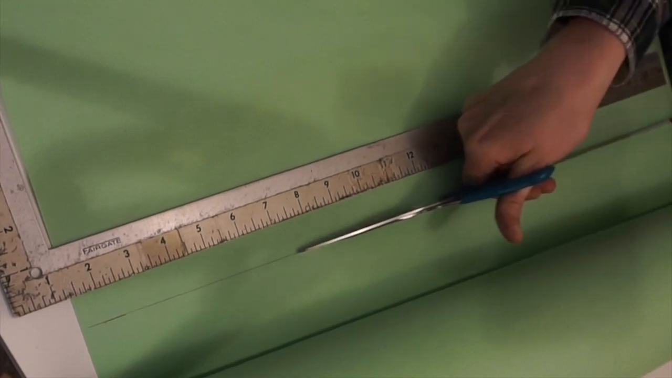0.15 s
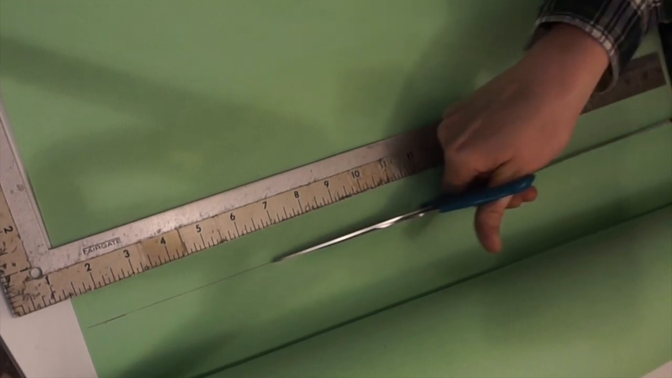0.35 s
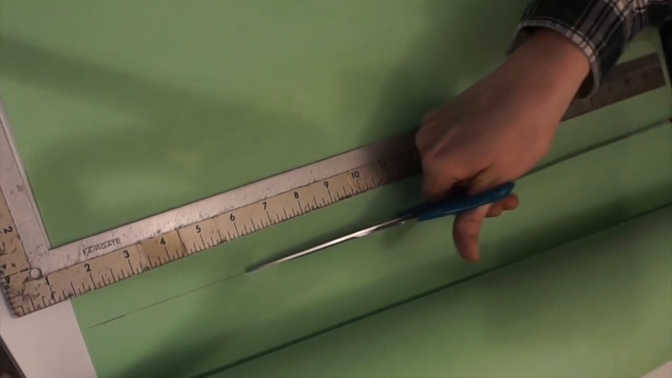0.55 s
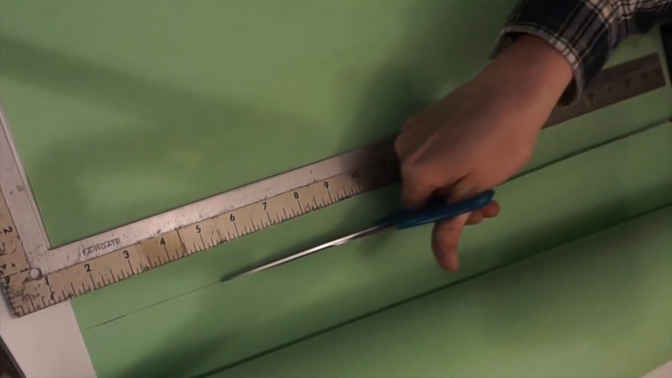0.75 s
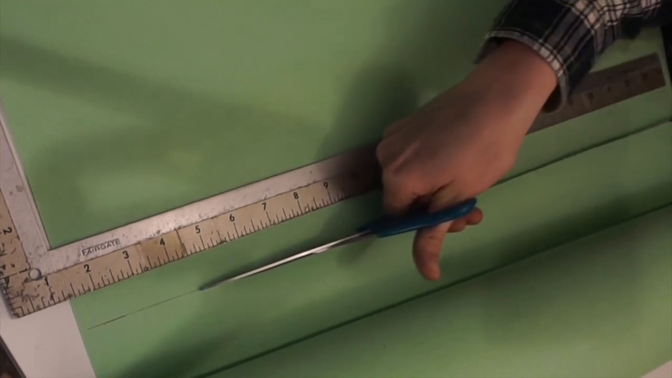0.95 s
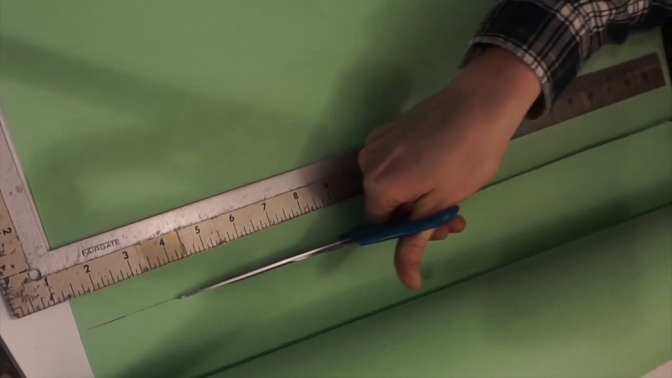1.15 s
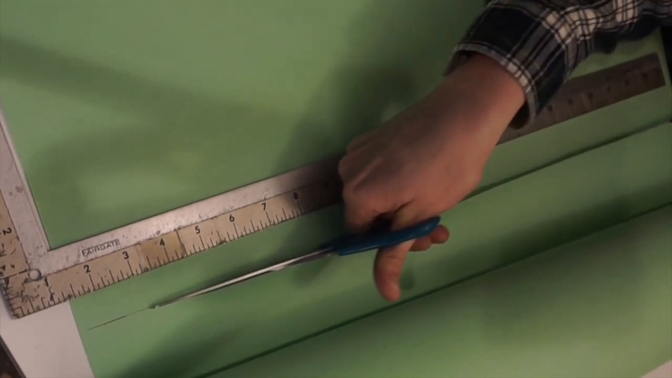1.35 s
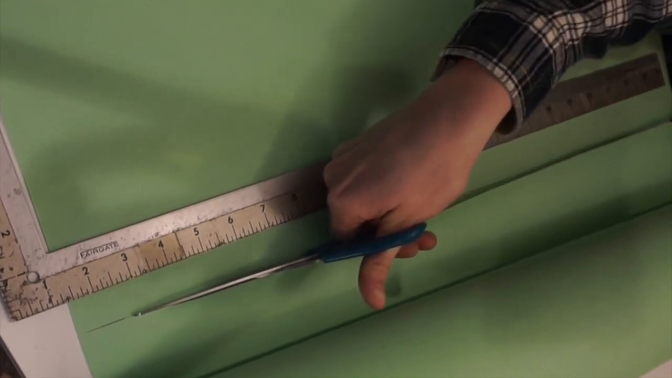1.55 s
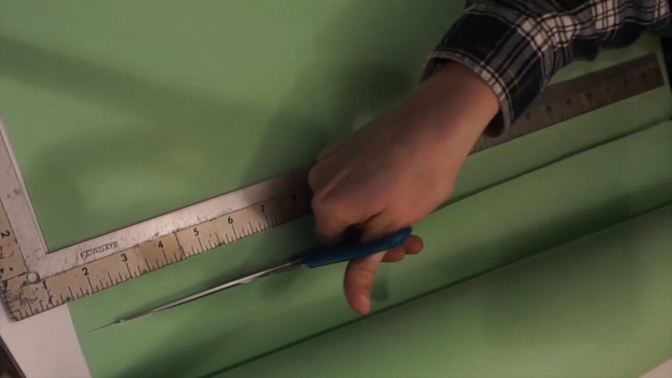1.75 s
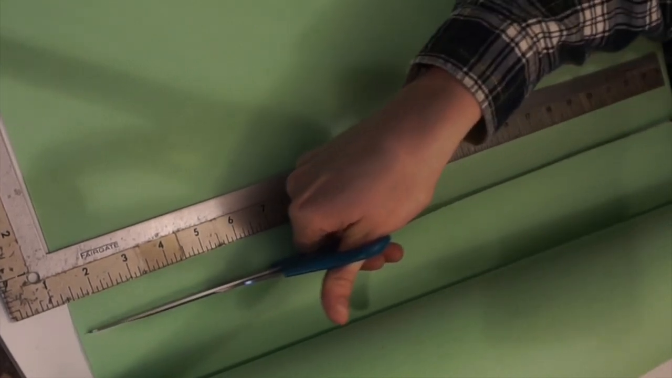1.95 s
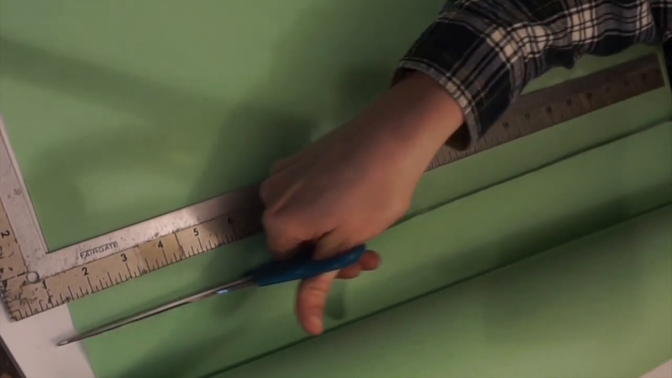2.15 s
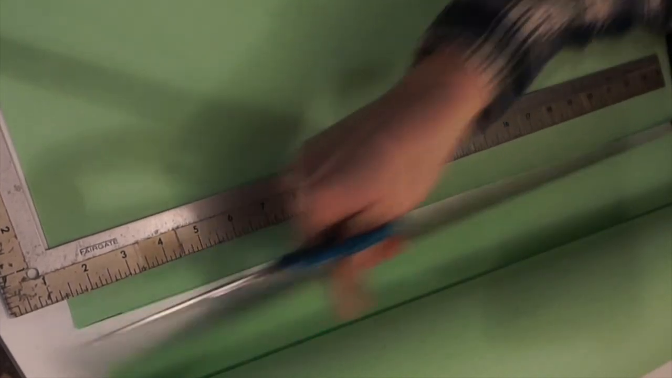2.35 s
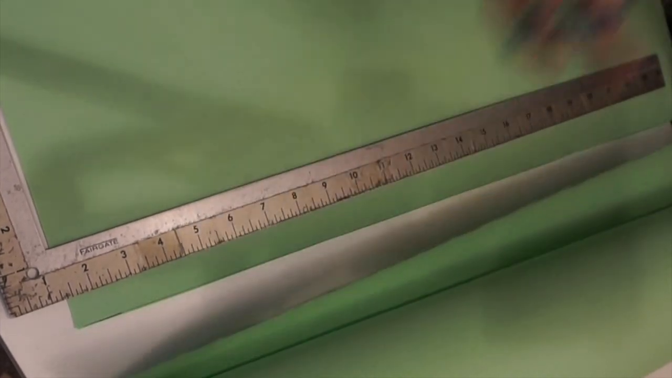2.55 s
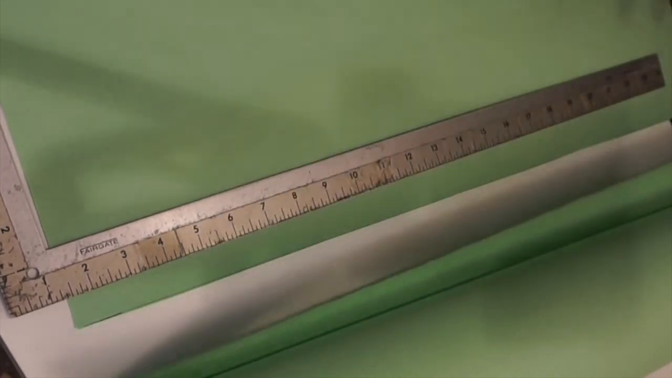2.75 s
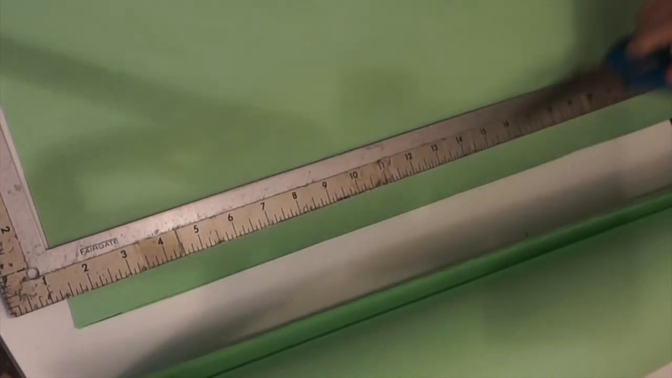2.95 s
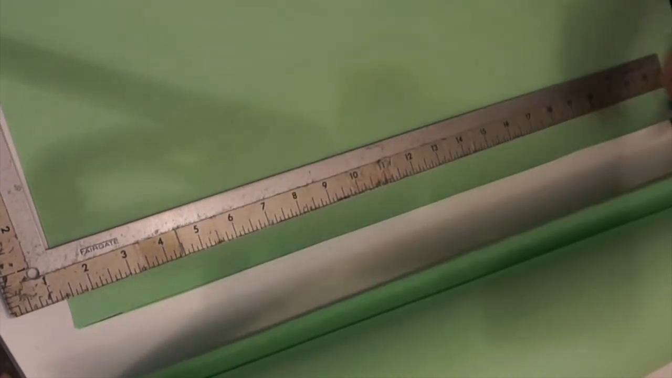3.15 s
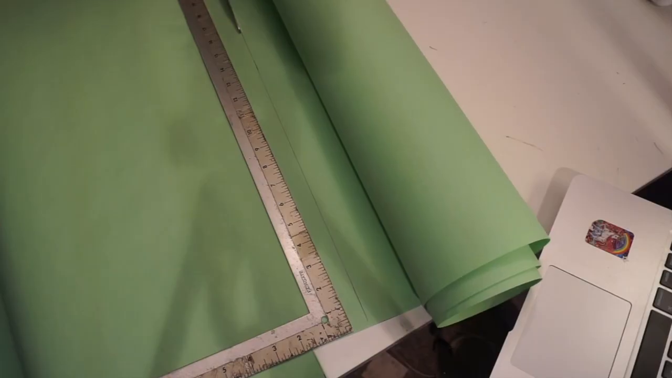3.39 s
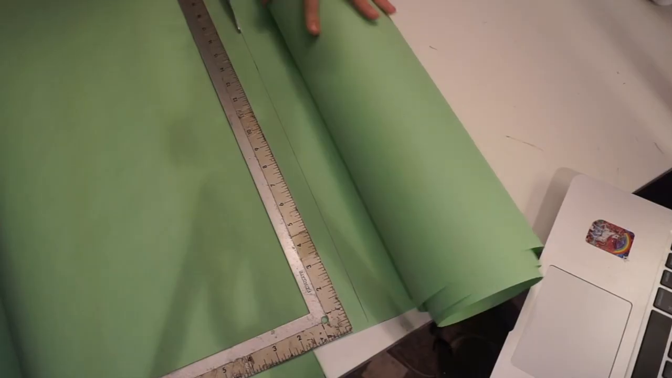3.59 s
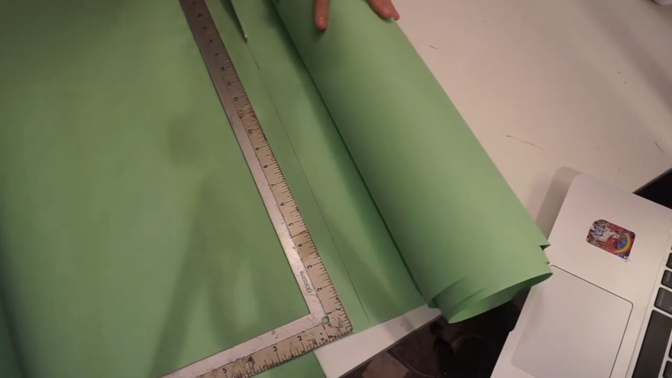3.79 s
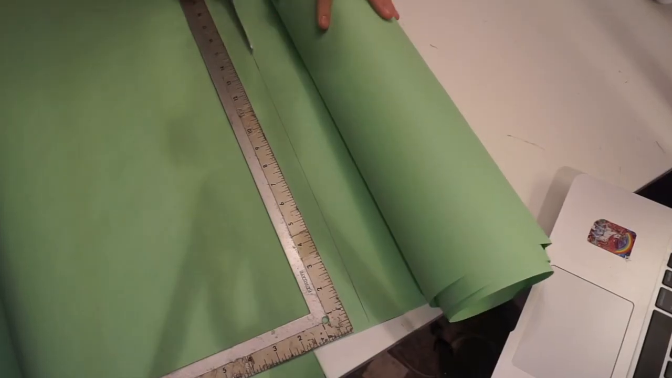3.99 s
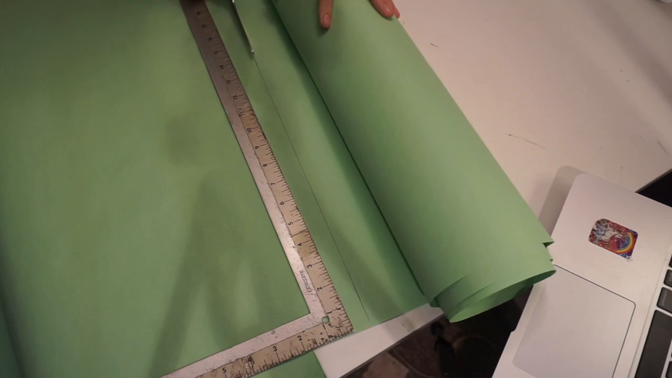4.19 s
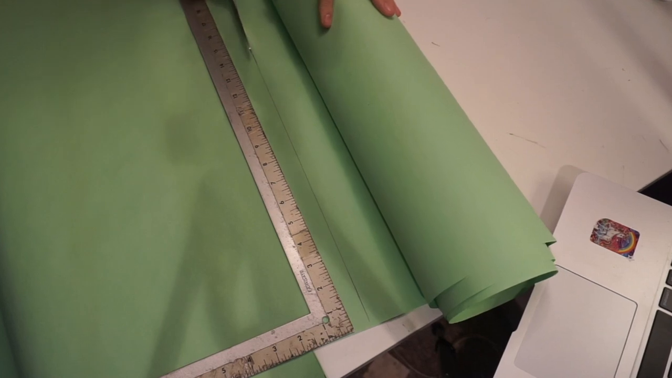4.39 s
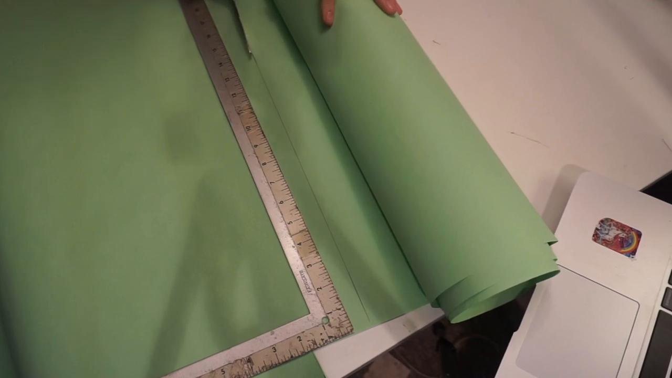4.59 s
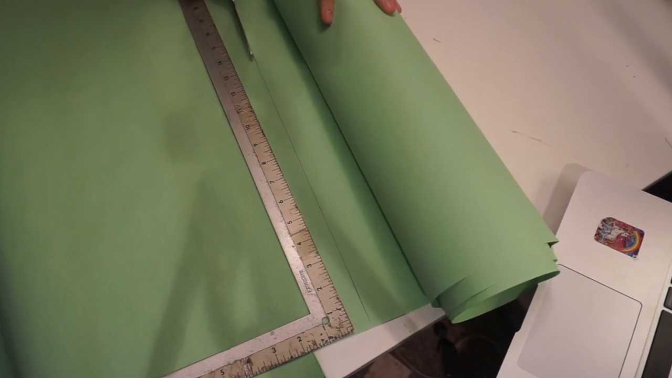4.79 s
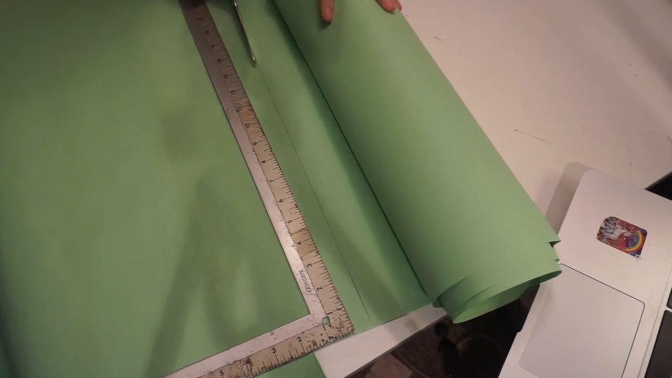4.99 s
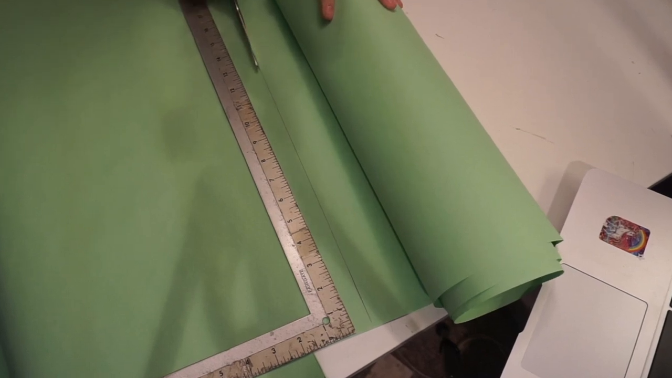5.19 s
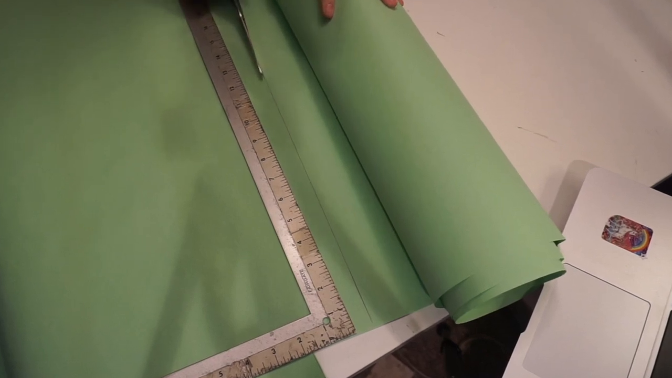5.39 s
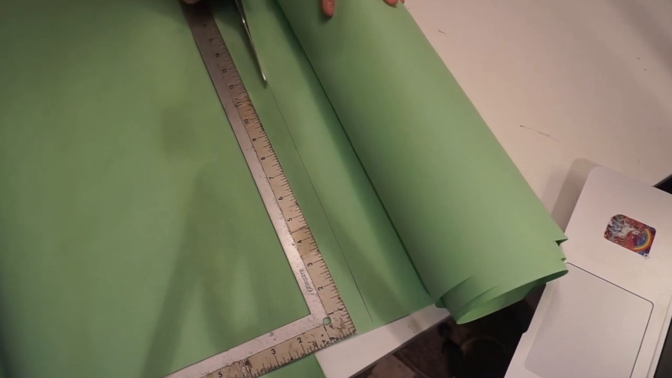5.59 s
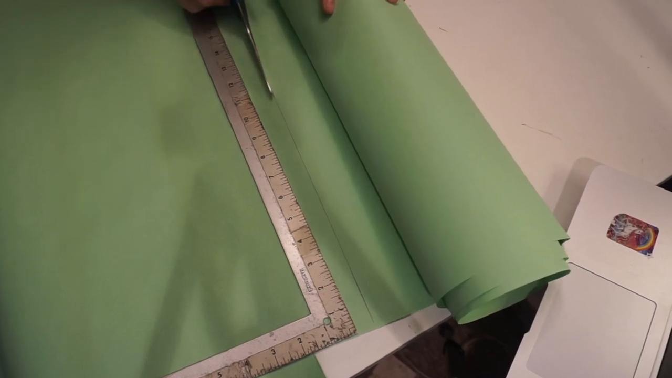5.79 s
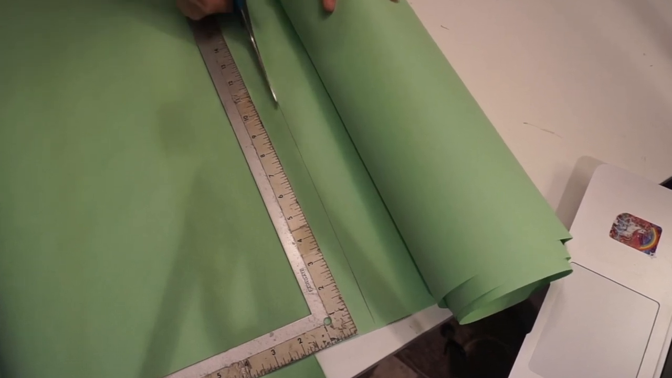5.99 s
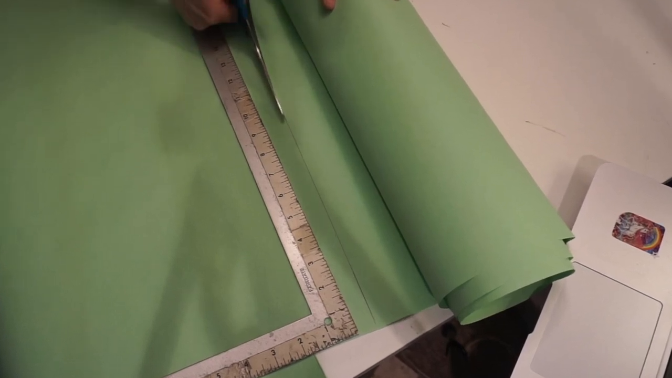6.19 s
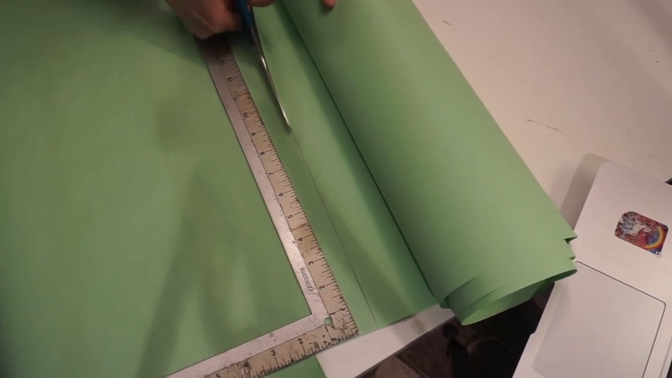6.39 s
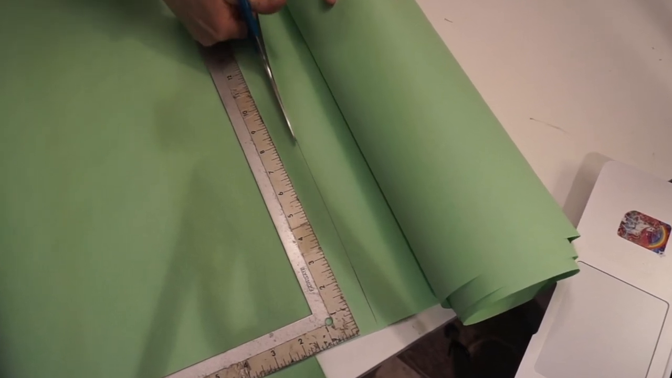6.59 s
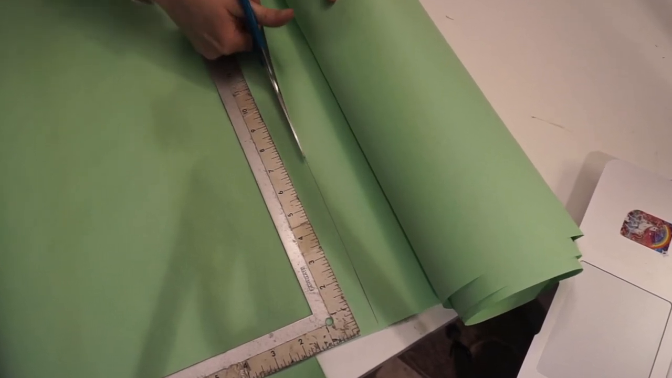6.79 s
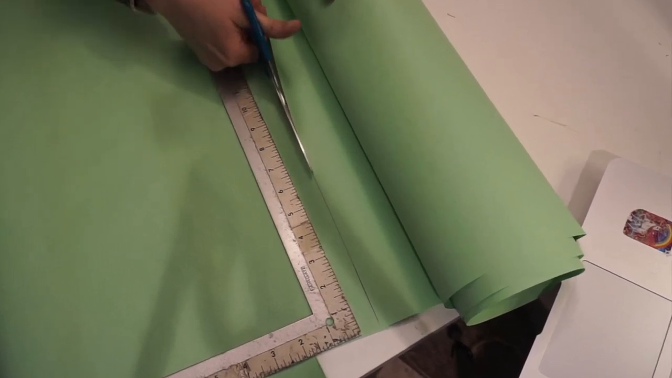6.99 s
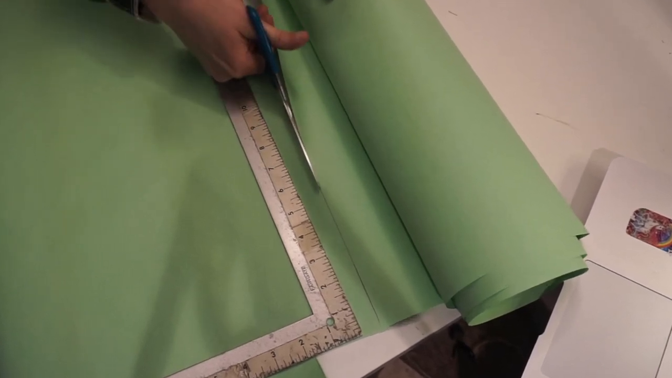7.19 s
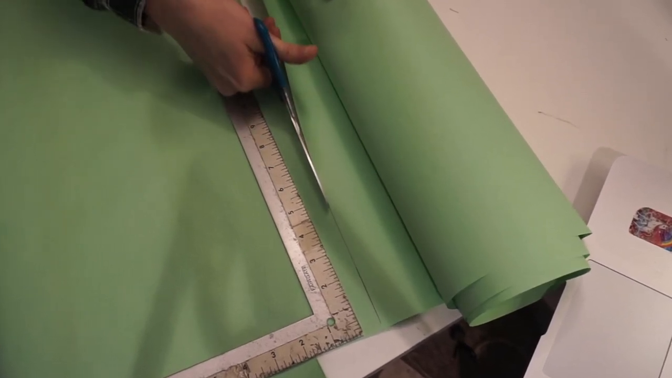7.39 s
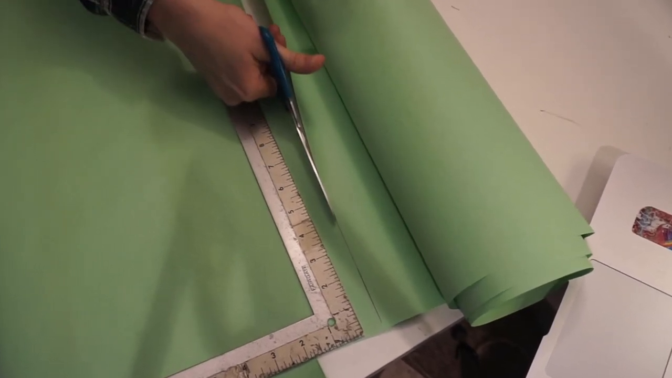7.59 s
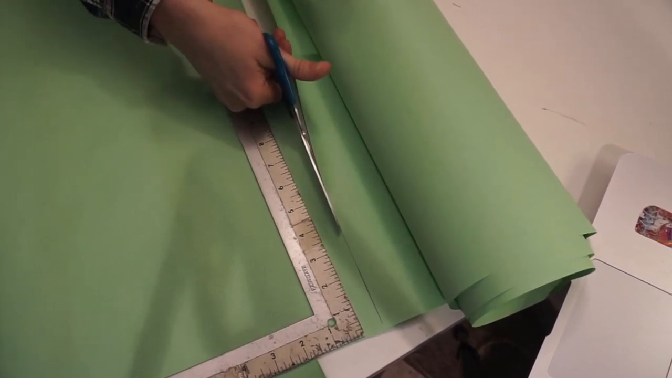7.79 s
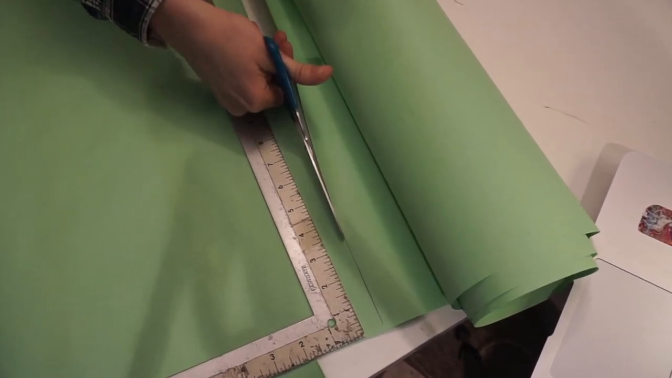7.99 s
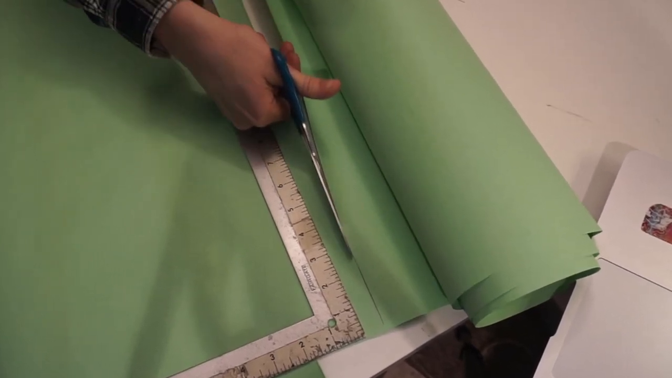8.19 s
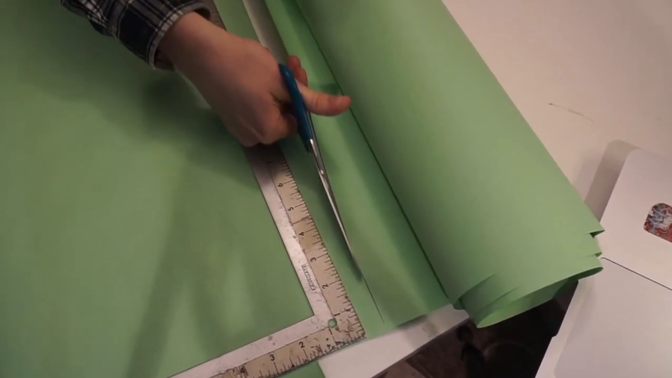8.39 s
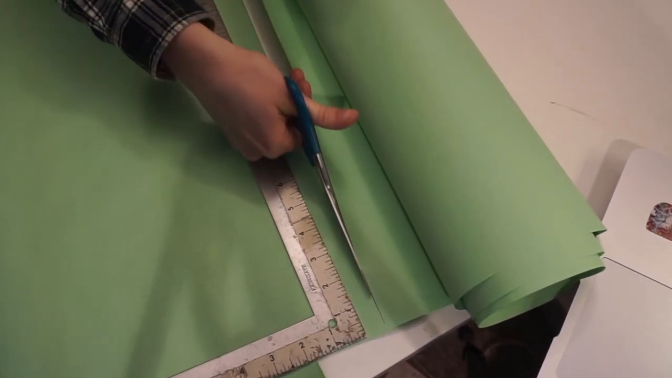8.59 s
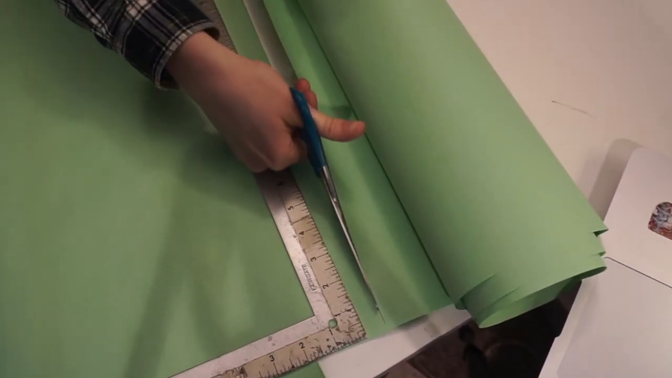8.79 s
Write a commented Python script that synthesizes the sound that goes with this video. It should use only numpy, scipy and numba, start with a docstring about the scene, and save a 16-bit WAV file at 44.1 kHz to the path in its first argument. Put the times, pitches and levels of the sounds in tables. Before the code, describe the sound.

A close, dry perspective in a small room with a very faint, wavering hush. From 0 s scissors push through thin paper with a dense, grainy rasp, bright and hissy, with a slight woody table resonance; two tiny clicks come at the start, and the blades catch briefly near 0.6 and 1.6 s. The cut ends around 2.15 s with crisp snaps, followed by soft knocks and paper rustles until 2.9 s, then near silence. At about 3.5 s there is a light rub and tick, and a short, softer stroke runs from 3.7 to 4.1 s, ending in small snaps. A quiet gap follows, then dragging and clicks at 4.5-4.8 s start a long rip, growing fuller and loudest around 6-7 s, with slight stalls at 5.1 and 6 s. It weakens, catches at 7.8-7.97 s with a cluster of sharp blade snaps, then a last strong rasp continues, easing slightly toward 8.9 s.

```python
"""Half-open scissors are pushed through thin paper lying on a table, in four strokes with stalls and pauses.
The cut is a dense rasp: thousands of random clicks, the snapping fibres, ring the paper and the table top.
Separate snaps and knocks also ring the blades; short drags of blade or paper swell and fade.
Roll, hand, ruler and sheet send back slightly delayed copies, and the walls a short noise tail.
Underneath lies a faint, slightly wavering hush made of filtered noise."""
import sys
import numpy as np
from scipy import signal
from scipy.fft import rfft, irfft
from scipy.io import wavfile
from scipy.ndimage import uniform_filter1d, map_coordinates
from numba import njit

SR = 44100
rng = np.random.default_rng(int(sys.argv[2]) if len(sys.argv) > 2 else 0)


def to_wav(s):
    """Save 16-bit WAV."""
    ch = np.atleast_2d(s).T  # columns
    pcm = np.round(np.clip(ch, -1, 1) * 32767)  # PCM
    wavfile.write(sys.argv[1], SR, pcm.astype(np.int16))


N = 390285  # length of the sound [samples]


def undb(db):
    """Turn decibels into a gain."""
    return 10 ** (np.asarray(db) / 20)


def level(x, db):
    """Scale a sound to an average (rms) level in dB."""
    return x * undb(db) / np.sqrt(np.mean(x ** 2))


def columns(rows):
    """Draw each column of a table out to one value per sample; the first column is time."""
    time_s, *values = np.transpose(rows)
    return [np.interp(np.arange(N) / SR, time_s, v) for v in values]


@njit
def moving_filter(x, hz, width_hz):
    """Band-pass filter (state-variable) whose centre and width may move; gain 1 at the centre."""
    y, band_state, low_state = np.empty(len(x)), 0., 0.
    for i in range(len(x)):
        g = np.tan(np.pi * hz[i] / SR)
        damping = width_hz[i] / hz[i]
        v = (band_state + g * (x[i] - low_state)) / (1 + g * (g + damping))
        band_state = 2 * v - band_state
        low_state = low_state + 2 * g * v
        y[i] = damping * v
    return y


def band(x, hz, width_hz):
    """Keep the pitches around a fixed or moving centre."""
    one = np.ones(len(x))
    # the tiny offset keeps the filter away from extremely small, slow numbers
    return moving_filter(x + 1e-18, np.clip(hz * one, 20, SR / 3), width_hz * one)


def walk(rate):
    """Random values, each held for 1 / rate seconds and smoothed twice; spread near 1."""
    hold = int(SR / rate)
    steps = np.repeat(rng.standard_normal(N // hold + 1), hold)
    return 1.18 * uniform_filter1d(uniform_filter1d(steps, hold), hold)[:N]


# colour of the hush, only its shape counts: (frequency [Hz], level [dB per Hz])
HUSH_COLOUR = [(15, -34), (25, -0.5), (254, 1), (336, -6), (381, -3), (884, -8.5), (954, -8.5), (4000, -16),
               (11000, -17), (14300, -46), (22000, -120)]


def hush():
    """Hush of room and microphone: coloured noise that wavers a little; only the bass is shared by both ears."""
    hz = np.maximum(np.fft.rfftfreq(N, 1 / SR), 1)
    colour_hz, colour_db = np.transpose(HUSH_COLOUR)
    gain = undb(np.interp(np.log(hz), np.log(colour_hz), colour_db))
    mid, side = rfft(rng.standard_normal((2, N)))
    apart = np.clip(hz / 300, .3, 1.1)  # the ears differ more towards the treble
    noise = irfft(gain * np.array([mid + apart * side, mid - apart * side]), N)
    return level(noise, -59) * undb(0.19 * walk(0.74))


ROOM_DB, ROOM_T60_S = -4.5, 0.17  # tail level, and the time the tail takes to fall by 60 dB


def room(x):
    """Wall echoes: a short noise tail, different at each ear, turning into another as the blades change place."""
    t = np.arange(8000) / SR
    tails = rng.standard_normal((2, 2, 8000)) * undb(-60 * t / ROOM_T60_S) * (t > .002)
    tails = level(tails, ROOM_DB) / np.sqrt(8000)
    turn = 2.513 * np.arange(N) / SR  # turning angle [radians]
    thin = (x - band(x, 160, 420)) * np.array([np.cos(turn), np.sin(turn)])
    return signal.fftconvolve(thin[None], tails, axes=2).sum(axis=1)[:, :N]


def late(x, ms, order):
    """The sound read back through a moving delay."""
    return map_coordinates(x, [np.arange(N) - ms * SR / 1000], order=order)


SCATTER_DB = -8


def scatter(x):
    """Echoes off hand, ruler and curled paper: wandering delays that lengthen as the blades move, three per ear."""
    stretch = 1 + 0.04555 * np.arange(N) / SR
    paths_ms = [(0.34 + 2.5 * rng.random()) * stretch + 0.1535 * walk(2.7) for _ in range(6)]
    thin = x - band(x, 1170, 5000)
    # every other echo is turned upside down
    ears = [sum((-1) ** k * late(thin, ms, order=2) for k, ms in enumerate(paths_ms[ear::2]))
            for ear in range(2)]
    return undb(SCATTER_DB) * np.array(ears)


def echo(x, paths):
    """Reflections that fade in, change length steadily and fade out."""
    out = np.zeros(N)
    for start, end, first_ms, last_ms, share in paths:
        i = np.arange(max(int(start * SR), 0), min(int(end * SR), N))
        progress = (i / SR - start) / (end - start)
        lag = (first_ms + (last_ms - first_ms) * progress) * SR / 1000
        fade = np.sqrt(np.sin(np.pi * progress).clip(0))
        out[i] += share * fade * map_coordinates(x, [i - lag], order=3)
    return out


# echo paths off small surfaces near the blades, such as roll, hand and ruler, that come, change length and go:
# (start [s], end [s], first delay [ms], last delay [ms], greatest share before BOUNCE_DB, negative if inverted)
BOUNCE_PATHS = [(0.0, 0.7, .555, .541, -.15), (.2, 1.4, 1.7, 2.7, .08), (3.6, 4.3, .545, .636, -.17),
                (4.6, 5.3, .925, .953, .25), (4.6, 5.7, .745, .921, -.13), (4.6, 6.2, .72, .624, .1),
                (4.8, 5.5, 1.105, 1.154, -.15), (4.8, 7.0, .795, .927, -.22), (5.0, 7.2, .895, 1.489, .09),
                (5.2, 6.3, .465, .586, .19), (5.4, 7.6, .815, 1.123, .15), (5.6, 6.3, .72, .783, .19),
                (5.6, 7.8, 1.97, 2.52, .12), (5.8, 8.0, 1.135, 1.267, .1), (6.6, 8.8, .52, .432, .13),
                (6.8, 7.9, .915, .86, -.17), (7.4, 8.1, .59, .562, .22), (7.6, 8.3, .655, .718, .19),
                (8.2, 9.3, .94, .896, .15)]
BOUNCE_DB = 4


def bounces(x):
    """Small surfaces near the blades return mainly the treble."""
    bright = signal.sosfiltfilt(signal.butter(2, 3300, "high", fs=SR, output="sos"), x)
    return undb(BOUNCE_DB) * echo(bright, BOUNCE_PATHS)


# ways the table top and ruler vibrate: (frequency [Hz], width [Hz], level [dB])
TABLE_MODES = [(84, 9.3, -13.5), (158, 30, -14.5), (217, 34, -11.5), (251, 33, -6.5), (385.5, 39, -3),
               (450, 24, -7.5), (580, 48, 3), (651, 53, 0), (757, 66, 0), (1070, 104, 1.5), (1206, 69, -1),
               (1348, 57, -3)]
# how strongly the blades drive table and sheet from where they press:
# (time [s], level under 200 Hz [dB], 200-500 Hz [dB], 500-700 Hz [dB], 700-900 Hz [dB],
#  900-1300 Hz [dB], over 1300 Hz [dB], sheet level [dB])
REACH_LEVELS = [(0, 4, -1, 2, 5.5, 2, 2.5, 7), (1.55, 0.5, -1.5, -0.5, 5, -8, 0, -1.5),
                (1.95, 2.5, -6, -1.5, 2.5, -3, -22, 4.5), (2.26, 3, 6, -0.5, 6, -2.5, -8, 5),
                (2.35, 10, 8, -0.5, -5, -5, -4, 5), (2.7, 3, 3.5, -2, -5, -9.5, -7, -5),
                (3.5, 6, 7.5, 5.5, 7, 6.5, -5, 9), (4.2, 6, 6.5, -0.5, -10, -6, -9, 3.5),
                (4.6, 0, 5, 0.5, -5, -6, 4, -11), (4.9, -1, 0.5, -1.5, -11, -9, -8, 0),
                (5.3, 0, 4.5, 3, -13, -1, -4, 0), (6.2, 0, -1, 1, -11, 1.5, -2, 1),
                (6.8, -1, 0, 0, -5.5, 4.3, 6, -3), (7.6, -8, -8.5, -6, -3, 1.3, -16, 10),
                (7.84, 3, -2, -2.5, 2, -2, 8.5, -3), (8.05, -3, -2, -5.5, 3.5, 0, 5, 5),
                (8.3, -3, -6.5, -3, -2, 0, 4, 6), (8.85, -5, -4, 1, -1, -8, -16, 3.5)]


def table_top(push):
    """A force rings every table mode, more or less strongly depending on where the blades press."""
    reach_db = columns(REACH_LEVELS)
    out = np.zeros(N)
    for k, (hz, width_hz, db) in enumerate(TABLE_MODES):
        zone = np.searchsorted([200, 500, 700, 900, 1300], hz)
        gain = (-1) ** k * undb(db + reach_db[zone]) / np.sqrt(width_hz)
        out += gain * band(push, hz, width_hz)
    return out


CRACKLE_DB, TREBLE_DB_PER_OCTAVE = 4, 49  # unevenness of grains; extra treble for brighter bursts


def bursts(rows, shape, narrow):
    """Crackling bursts of a given shape: one force for the paper, one for the table."""
    paper, board, t = np.zeros(N), np.zeros(N), np.arange(7000) / SR
    for s, db, share_db, hz, span_s in rows:
        noise, size = rng.standard_normal((2, 7000))
        # uneven grains; the first contact is one firm click
        grains = level(noise * undb(CRACKLE_DB * size), 0) + 2.3 * (t == 0)
        burst = grains * undb(db) * shape(t / max(span_s, .003))
        body = band(band(burst, hz, 0.84 * narrow * hz), hz, 3.2 * narrow * hz) / np.sqrt(narrow)
        treble = undb(TREBLE_DB_PER_OCTAVE * np.log2(hz / 4000)) * band(burst, 15400, 5000)
        i = int(s * SR)
        paper[i:i + 7000] += body + treble
        board[i:i + 7000] += burst * undb(share_db)
    return np.array([paper, board])


# short drags of blade or paper: (time [s], level [dB], table share [dB], colour [Hz], length [s])
DRAG_EVENTS = [(.03, -33.5, 3.5, 900, 0.021), (2.182, -39, 2.5, 900, 0.096), (2.288, -40, 3, 700, 0.011),
               (2.388, -50, -13, 3000, 0.026), (2.55, -52, -17, 2000, 0.092), (2.585, -45, -9, 2700, 0.079),
               (2.63, -50, -6, 2500, 0.11), (2.708, -39.5, -20, 3200, 0.013), (2.72, -54, -10, 2500, 0.13),
               (2.9, -51.5, 2, 1200, 0.028), (3.504, -42, -3, 1500, 0.0094),
               (3.516, -23.5, -9.5, 2200, 0.02), (4.2, -58, -3, 3000, 0.11), (4.28, -58, 1.5, 3500, 0.09),
               (4.36, -45.5, -25, 2270, 0.089), (4.364, -41, -25, 3000, .014),
               (4.465, -39, -12, 2710, 0.048), (4.527, -31.5, -0.5, 1980, 0.023),
               (4.55, -26, -5, 1900, 0.041), (4.59, -23, -9, 1980, 0.019), (4.617, -29, 2.5, 1600, 0.01),
               (4.655, -29.5, -2.5, 1700, 0.033), (7.8, -26, -3.5, 1350, 0.034),
               (7.84, -17, -18, 3500, 0.03), (7.868, -23, -9.5, 3420, 0.025)]


def drags():
    """Rubbing: each burst of grains swells and fades."""
    return bursts(DRAG_EVENTS, lambda u: np.sqrt(np.sin(np.pi * np.minimum(u, 1)).clip(0)), narrow=0.74)


# sharp snaps and knocks:
# (time [s], level [dB], table share [dB], colour [Hz], time to fall by 60 dB [s])
SNAP_EVENTS = [(0.0465, -15, -23, 3630, 0.071), (0.0615, -13, -15, 4000, 0.017),
               (1.5883, -18.5, -38, 4900, 0.018), (1.606, -16, -27, 4500, 0.033),
               (2.1615, -9, -16.5, 4340, 0.02), (2.168, -19, -13, 4300, .015),
               (2.1745, -18, -24, 4400, 0.0073), (2.2605, -27.5, 4, 2290, 0.059),
               (2.3134, -30, -20, 4620, 0.015), (2.3438, -36, -3, 2790, 0.031),
               (2.3827, -19.5, -12, 2460, 0.015), (2.5416, -35, -5.5, 2300, 0.024),
               (2.6274, -27, 0.5, 2340, 0.021), (2.6385, -30, 0, 1530, 0.027),
               (2.646, -33, -12, 1800, .012), (2.6888, -32.5, -6.5, 1750, 0.044),
               (3.3947, -41.5, -16, 1640, 0.063), (3.5231, -20, -18, 2560, 0.045),
               (3.5962, -29.5, -12, 2000, 0.032), (4.0214, -13, -22, 4050, 0.041),
               (4.061, -24, -25, 3500, .015), (4.1, -22, -25, 4500, .012), (4.152, -23, -23, 4200, .012),
               (4.4585, -46, -1, 1200, 0.028), (4.5345, -19, -16, 2200, 0.02),
               (4.626, -15, -5, 1500, 0.024), (4.631, -19, -8, 1500, 0.025),
               (4.7445, -16.5, -32, 3000, 0.017), (4.7575, -18, -30, 2600, .015),
               (4.776, -15, -37, 3810, 0.031), (7.7932, -18, -9, 2870, 0.053),
               (7.824, -8.5, -19, 3360, 0.025), (7.902, -15.5, -11.5, 3760, 0.021),
               (7.908, -9, -29, 3940, 0.012), (7.9394, -31, -30, 3870, 0.028),
               (7.9535, -10, -16, 3500, 0.0077), (7.9597, -8, -30, 3770, 0.012),
               (7.9678, -13, -26, 3720, 0.01)]


def snaps():
    """Snapping and knocking: each burst of grains starts at once and dies away."""
    return bursts(SNAP_EVENTS, lambda u: undb(-60 * u), narrow=0.8)


# ringing of knocked scissor blades:
# (frequency [Hz], level [dB], decay by 60 dB [s], where values over 0.03 affect only the loudness)
BLADE_MODES = [(1770, -6, 0.063), (2150, -23, 0.11), (2820, -1, 0.038), (3900, 1, 0.011), (5200, -21, 0.11)]
BLADES_DB = -12.5


def blades(knock):
    """A knock rings the steel at a few pitches; a narrower band rings longer."""
    out = np.zeros(N)
    for hz, db, t60_s in BLADE_MODES:
        width_hz = np.log(1000) / np.pi / min(t60_s, .03)
        out += undb(db + BLADES_DB) * np.sqrt(t60_s * hz) * band(knock, hz, width_hz)
    return out / np.sqrt(10)


DEEP_CUT = 0.53  # share of the deepest table sound taken out of all snaps and drags


def handling():
    """Snaps and drags sound in the paper and ring the table; the snaps also ring the blades."""
    sharp = snaps()
    paper, board = sharp + drags()
    push = board - DEEP_CUT * band(board, 74, 90)
    return paper + blades(sharp[0]) + undb(34.0) * table_top(push)


# strokes of the blades with the faint rustle of the sheet around them, one list for each:
# (time [s], rasp level [dB], treble level over rasp [dB])
STROKE_LEVELS = [
    [(0.0, -32, 2.5), (0.1, -32.5, 5), (0.35, -31, 0.5), (0.55, -28, 0), (0.64, -27, -1.5),
     (0.8, -26.5, -2.5), (1.0, -27.5, -1.5), (1.15, -28.5, -2.5), (1.3, -27, -3.5), (1.5, -28.5, -3.5),
     (1.63, -33, -7), (1.75, -26.5, -2), (2.02, -25, 0), (2.15, -36, 8.5), (2.18, -43.5, 2),
     (2.276, -47, 3.5), (2.33, -61, 5), (2.48, -72, 10), (2.75, -66.5, 8), (2.95, -74, 9), (3.05, -86, 6)],
    [(3.2, -90, 3), (3.29, -76, 11), (3.33, -77, 5), (3.5, -76, 7), (3.54, -53, 17), (3.646, -55.5, 3),
     (3.674, -50, 8), (3.684, -41, 0), (3.7, -33, 3.5), (3.854, -33, 5), (3.89, -30, 5), (4.02, -29.5, 0.5),
     (4.108, -44, 5), (4.188, -42.5, -2), (4.2, -59, 1), (4.3, -69.5, 7.5), (4.72, -60, 11.5)],
    [(4.738, -40, -5), (4.755, -34.5, 6), (4.8, -29.5, -3.5), (5.05, -29.5, -1.5), (5.4, -28, -1),
     (5.84, -23, -4), (6.13, -24.5, -1), (6.55, -22.5, -7), (6.6, -20.5, -3.5), (6.72, -22, 1),
     (6.85, -25, -2.5), (7.03, -23, -2.5), (7.15, -23.5, -3.5), (7.43, -26.5, -0.5), (7.61, -30, -2.5),
     (7.75, -27.5, -3.5)],
    [(7.8, -21, -7), (7.97, -27, -5.5), (8.07, -21, -5.5), (8.18, -21, -6), (8.29, -22, -4),
     (8.45, -24.5, -3.5), (8.62, -27, -8), (8.85, -28, -1)],
]
# the blades catch, slow down and break free: (release time [s], rasp drop [dB], slowing time [s])
STALL_EVENTS = [(0.6, 9.5, 0.043), (1.574, 13, 0.075), (5.13, 8.5, 0.052), (5.99, 5, 0.21),
                (7.785, 12, 0.021), (7.897, 16, 0.097), (7.933, 14, 0.017), (8.258, 3.5, 0.052),
                (8.754, 3.5, 0.043)]
FREE_SHARE, STALL_DULL = 0.43, 0.14  # recovery time over slowing time; extra treble loss per dB of drop
WAVER_DB = 0.44
DRUM_UNDER_DB, DRUM_TOP_DB, DRUM_KNEE_DB = -3, -41, 4  # drumming follows a faint rasp, then levels off


def effort():
    """Rasp, treble and table levels in dB: the strokes, dented by the stalls; nearly silent before the
    second and third strokes, while the last push follows on without a gap."""
    one, two, three, four = STROKE_LEVELS
    rows = []
    for part in (one, two, three + four):
        rows += [(part[0][0] - 1e-3, -90, 0), *part, (part[-1][0] + 1e-3, -90, 0)]
    rasp_db, treble_db = columns(rows)
    t = np.arange(N) / SR
    drop_db = sum(np.interp(t, [s - slow_s, s, s + FREE_SHARE * slow_s], [0, db, 0])
                  for s, db, slow_s in STALL_EVENTS)
    rasp_db = rasp_db - drop_db + WAVER_DB * walk(16)
    follow_db = rasp_db + DRUM_UNDER_DB
    # a soft choice of the lower of two levels
    drum_db = -DRUM_KNEE_DB * np.logaddexp(-follow_db / DRUM_KNEE_DB, -DRUM_TOP_DB / DRUM_KNEE_DB)
    return rasp_db, rasp_db + treble_db - STALL_DULL * drop_db, drum_db


def fibres(rate, spread_db, judder_db):
    """Dense snapping fibres (rate per second): mostly tiny clicks, a few large, in uneven clusters."""
    when, size, sign = rng.random((3, N))
    rarity = np.minimum(-np.log(1 - size), 6)
    clicks = (when < rate / SR) * np.sign(sign - .5) * undb(spread_db * rarity)
    return level(clicks * undb(judder_db * walk(60)), 0)


def drumming(tear):
    """The tear shakes the table top and the loose sheet, with added grain of their own."""
    board = table_top(0.46 * tear + fibres(3000, 1.77, 1.8))
    sheet = band(tear + 6.1 * fibres(6000, 2.1, 2.95), 1980, 1400)
    return level(board, 0) + undb(columns(REACH_LEVELS)[-1]) * level(sheet, -1.2)


# the finest hiss also returns inverted from the sheet right by the blades:
# (start [s], end [s], first delay [ms], last delay [ms], greatest share, negative if inverted)
GLANCE_PATHS = [(0.1, 2.1, .32, .27, -.52), (3.5, 4.3, .45, .45, -.32), (4.7, 7.1, .285, .29, -.45),
                (6.8, 8.0, .33, .335, -.5), (7.7, 9.2, .55, .18, -.37)]


def fine_hiss(tear):
    """The smallest fibres hiss in the high treble, with a very short echo off the sheet."""
    fine = tear + 0.65 * fibres(8000, 4.5, 0.25)
    hiss = band(band(fine, 12640, 8800), 9000, 20000)
    return level(hiss + echo(hiss, GLANCE_PATHS), 0)


# the slit paper rings in bands that move with the blades; frequencies are before small filter offsets:
# (time [s], main frequency [Hz], lower frequency [Hz], lower level over main [dB], upper level over main [dB])
PAPER_RINGS = [(0, 3930, 3000, -10, 1), (.4, 4630, 3100, -0.5, 1.5), (.8, 4700, 3200, -5.5, -6),
               (1.2, 4760, 3180, -2, -6), (1.6, 4770, 3440, -3.5, -4), (1.85, 5300, 3500, -3, -1),
               (2.05, 5430, 3530, -3.5, -5), (2.3, 3640, 2300, -6, -1), (3.55, 3500, 1980, 6, 8),
               (3.7, 4560, 2900, -5, -7), (4.0, 4140, 2240, 2.6, 0.5), (4.2, 3830, 2270, 0, -5),
               (4.75, 4000, 2310, -1.5, -4), (5.15, 3950, 2270, 0.5, -5.5), (5.55, 3770, 2150, -5.5, -12.5),
               (5.85, 3430, 2030, -7.5, -8.5), (6.1, 3330, 2110, -9, -4.5), (6.45, 3300, 1920, -10, -7),
               (6.8, 3500, 2000, -9, -5), (7.2, 3510, 2000, -5, -2.5), (7.6, 3550, 2400, -3.5, -2.5),
               (7.85, 3200, 1620, -24, -6), (8.05, 3780, 2720, -9, -12), (8.35, 4220, 2740, -3, -7.5),
               (8.62, 4220, 2800, -3.5, -4), (8.85, 4600, 2800, 4.5, -1.5)]
# basic widths of two bands, scaled in each filter: (time [s], main width [Hz], lower width [Hz])
RING_WIDTHS = [(0, 1980, 1320), (2.3, 2060, 1140), (3.6, 1500, 1300), (4.75, 1800, 1270), (5.5, 1620, 1270),
               (6.2, 1280, 1300), (6.9, 1770, 1290), (7.6, 1860, 1310), (8.1, 1660, 1100), (8.6, 1340, 750),
               (8.85, 1700, 810)]
UPPER_HZ, UPPER_FOLLOWS = 5270, 0.13  # upper band and its share of the main shift


def paper_ring(tear):
    """Snapping fibres ring the slit paper in a main, a lower and an upper band."""
    main_hz, low_hz, low_db, up_db = columns(PAPER_RINGS)
    width_hz, low_width_hz = columns(RING_WIDTHS)
    up_hz = UPPER_HZ + UPPER_FOLLOWS * (main_hz - main_hz.mean())
    ring = tear + fibres(8000, 4.26, 0.76)
    main = band(ring, main_hz - 0.28 * width_hz, 0.43 * width_hz)
    main = band(main, main_hz + 0.11 * width_hz, 0.5 * width_hz)
    lower = band(0.35 * ring + fibres(8000, 3.25, 1.0), low_hz - 0.1 * low_width_hz, 0.99 * low_width_hz)
    lower = band(lower, low_hz + 0.28 * low_width_hz, 1.5 * low_width_hz)
    upper = band(band(0.64 * ring + fibres(8000, 2.7, 1.0), up_hz, 2260), up_hz, 6000)
    return level(main, 0) - undb(low_db) * level(lower, 0) - undb(up_db) * level(upper, 0)


def cutting():
    """The tear rings paper and table; part of the grain is common to all, part their own."""
    rasp_db, hiss_db, drum_db = effort()
    tear = fibres(5000, 3.62, 0.95)
    rasp = undb(rasp_db - 2.5) * paper_ring(tear)
    hiss = undb(hiss_db) * fine_hiss(tear)
    drum = undb(drum_db) * drumming(tear)
    return rasp + hiss + drum


# the blades travel across: (time [s], left minus right level [dB])
BLADE_PLACE = [(0.0, 1), (1.2, -1), (2.2, -0.5), (2.55, 3.5), (3.4, -4), (3.72, 1), (6.2, 0.4), (7.94, -3),
               (8.85, -2.5)]


def scene():
    """Cut and handling with their echoes, placed left to right over the hush."""
    pan_db = columns(BLADE_PLACE)[0]
    x = cutting() + handling()
    heard = x + bounces(x) + scatter(x) + room(x)
    return undb(-1.5) * heard * undb(np.array([pan_db, -pan_db]) / 2) + hush()


def record(dry):
    """The recorder steeply cuts everything above 10960 Hz."""
    return signal.sosfilt(signal.ellip(12, .3, 75, 10960, fs=SR, output="sos"), dry)


dry = scene()
out = record(dry)
to_wav(out)
```